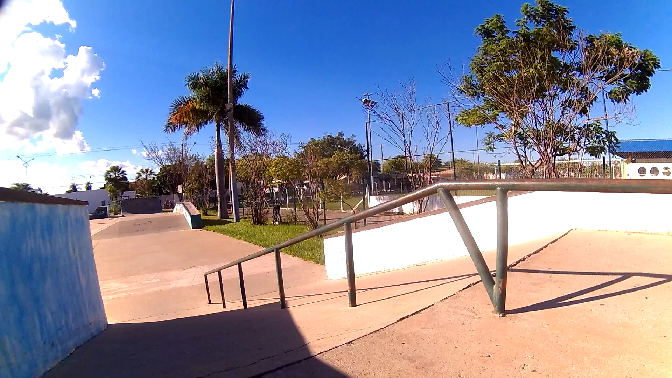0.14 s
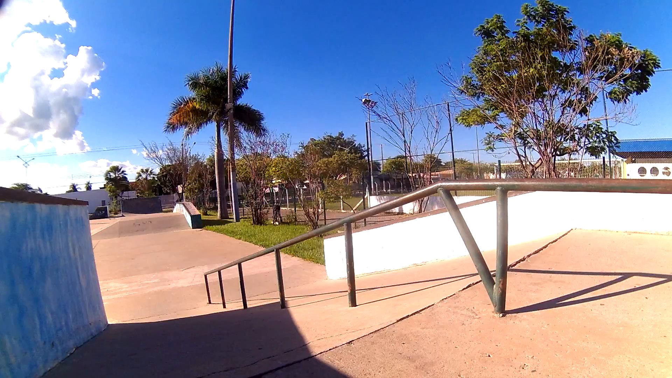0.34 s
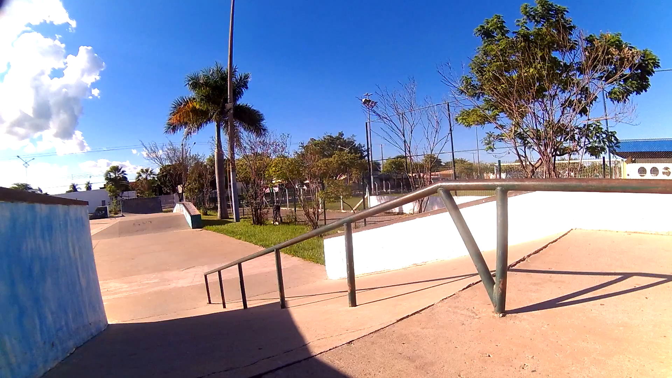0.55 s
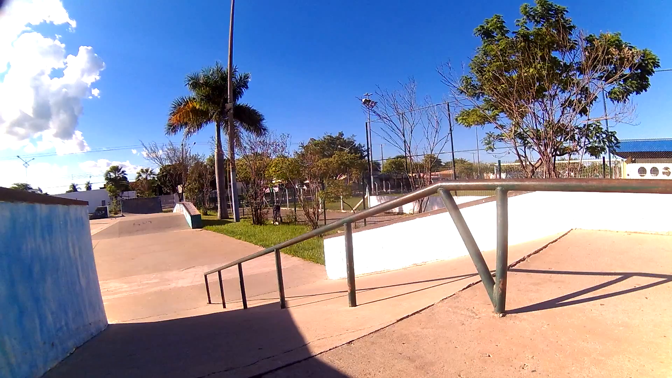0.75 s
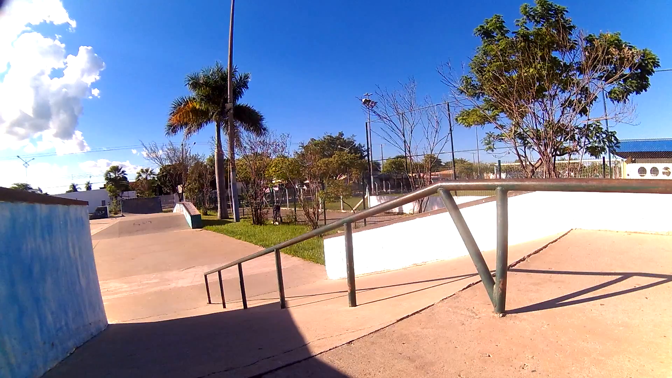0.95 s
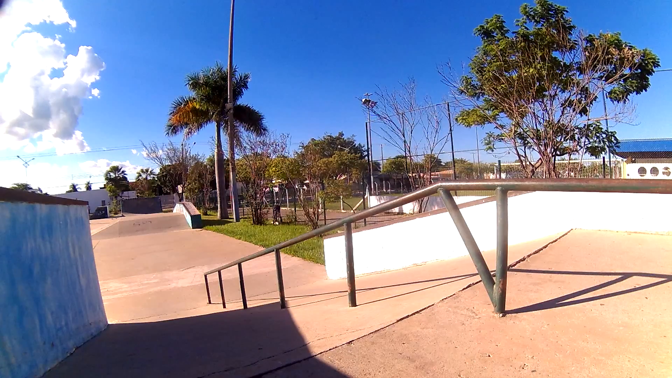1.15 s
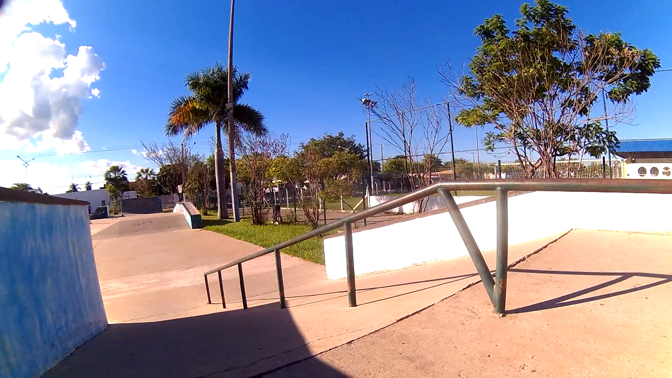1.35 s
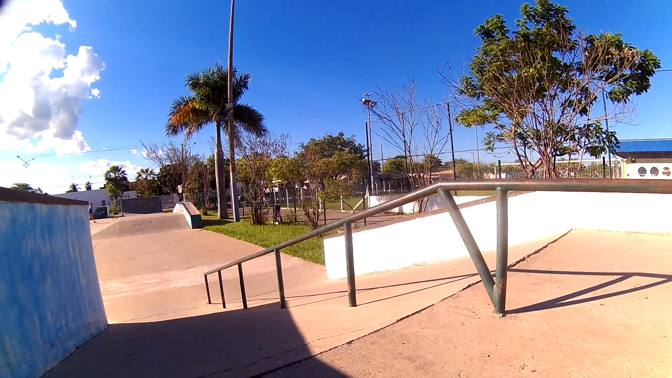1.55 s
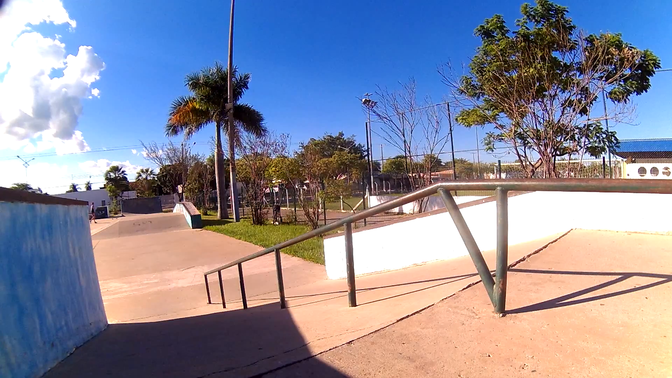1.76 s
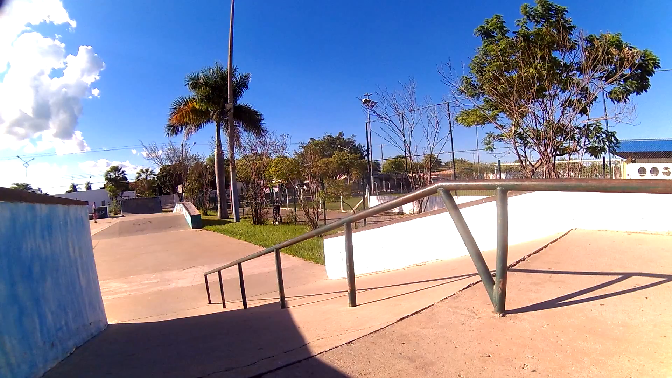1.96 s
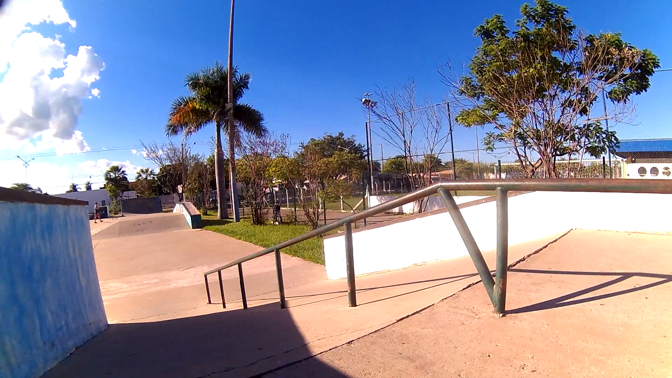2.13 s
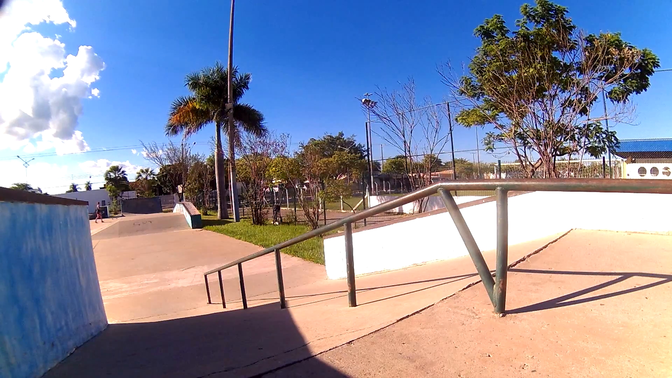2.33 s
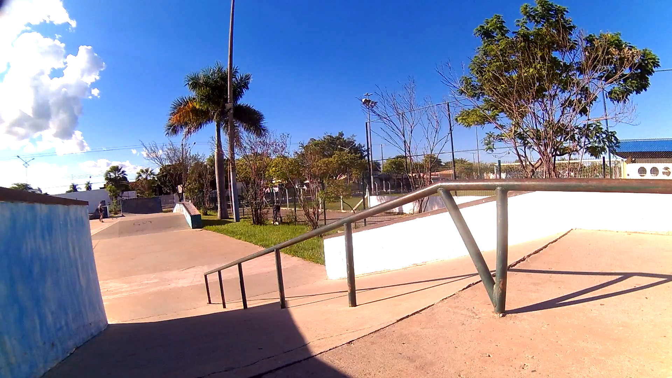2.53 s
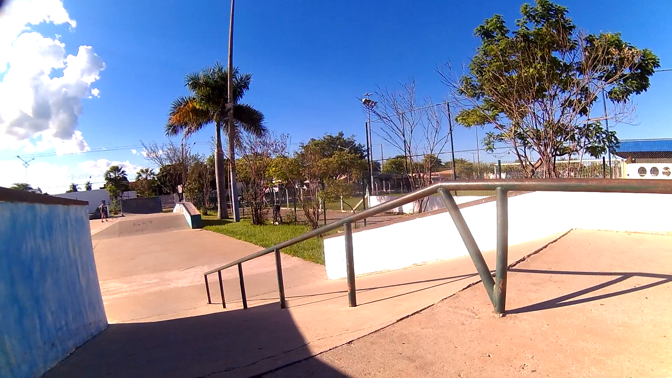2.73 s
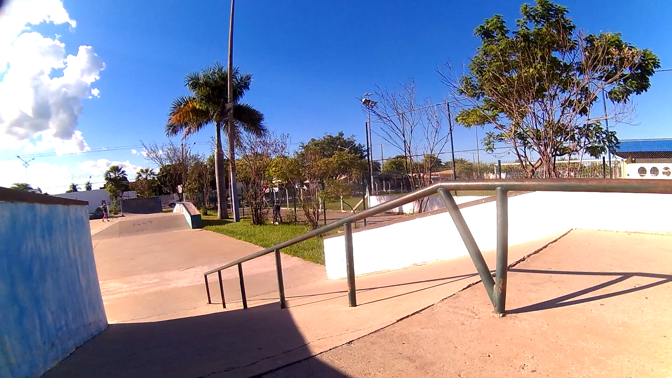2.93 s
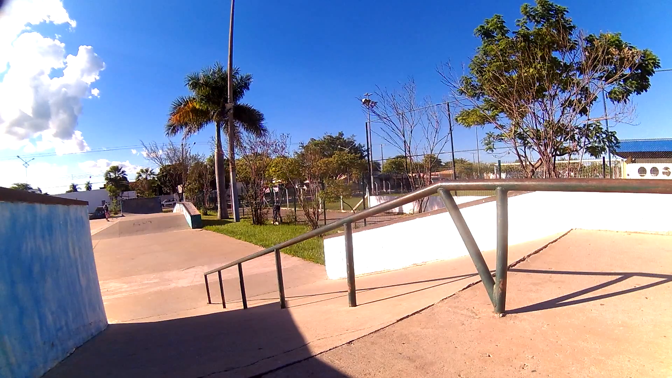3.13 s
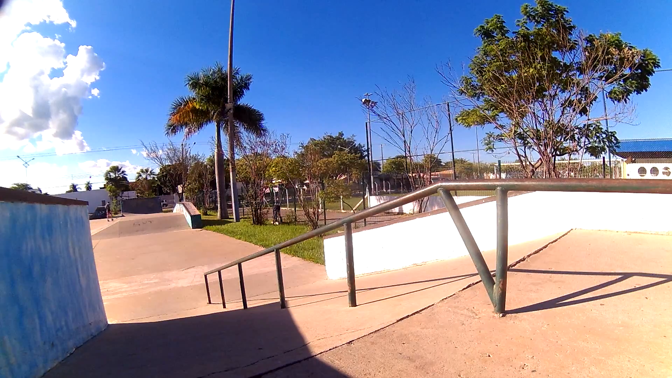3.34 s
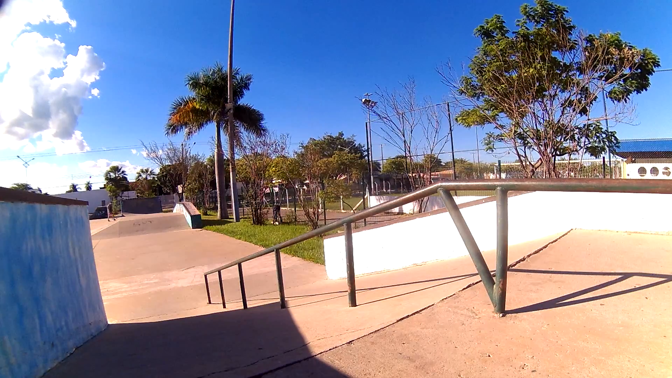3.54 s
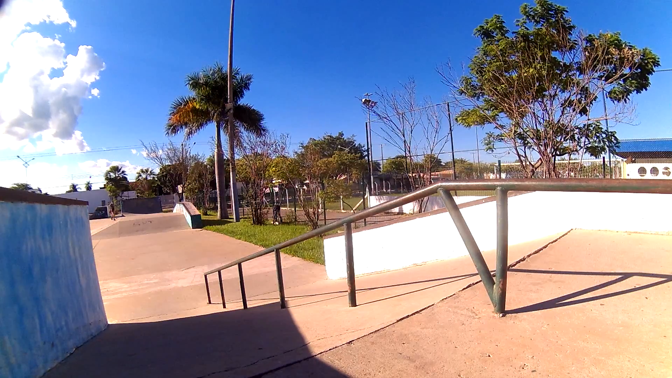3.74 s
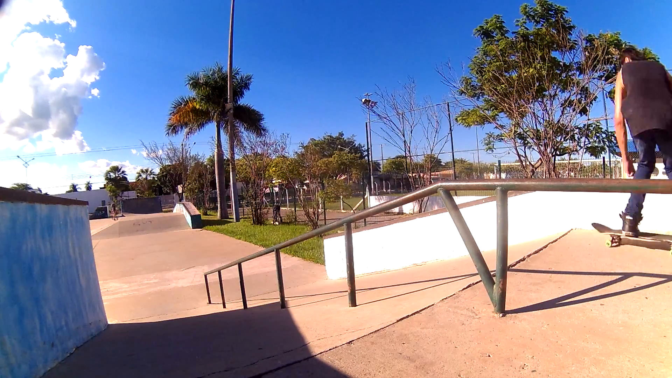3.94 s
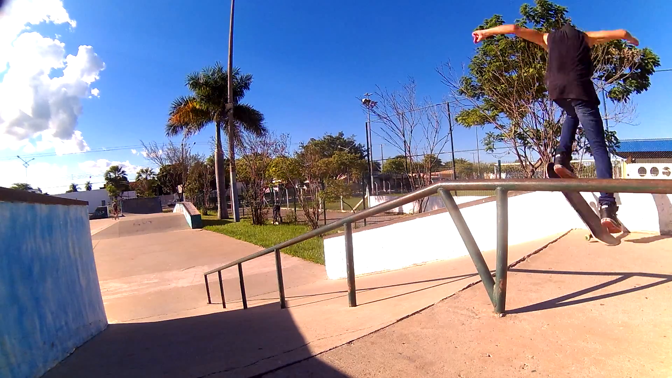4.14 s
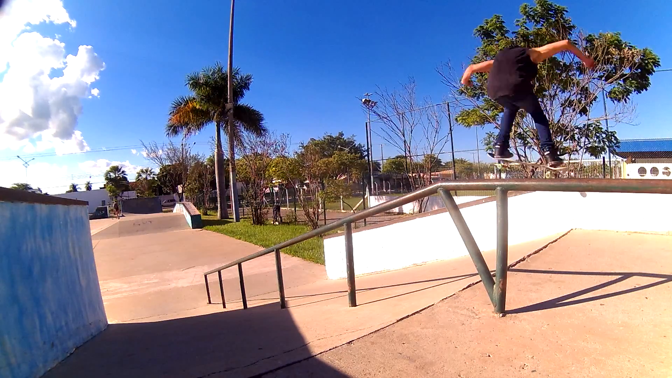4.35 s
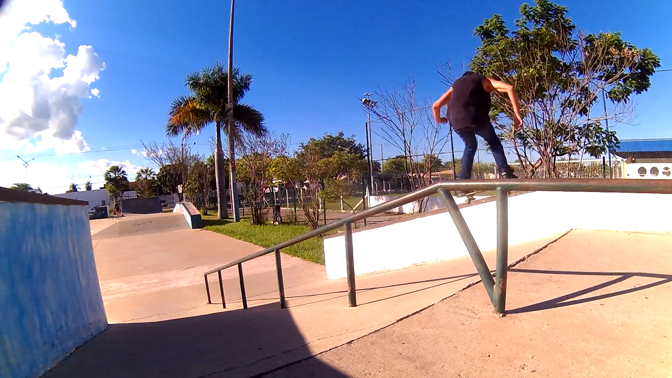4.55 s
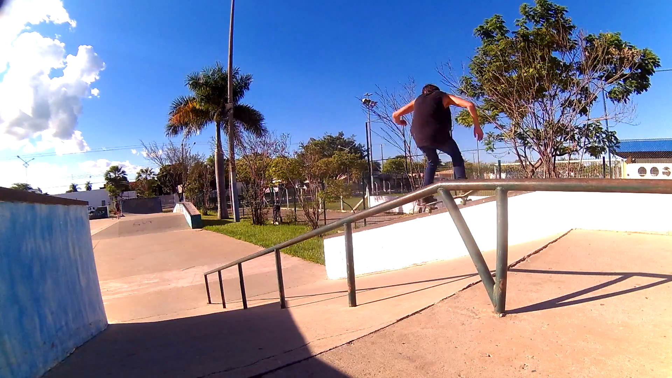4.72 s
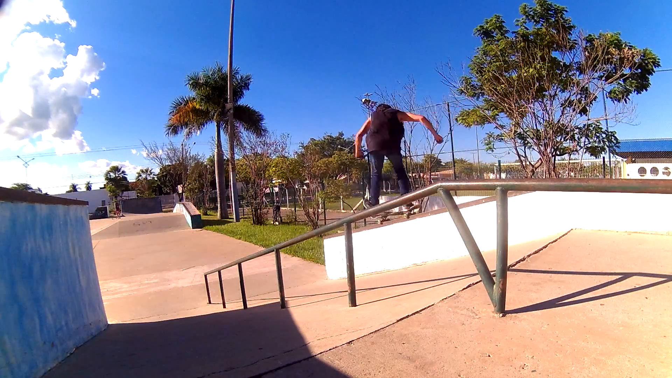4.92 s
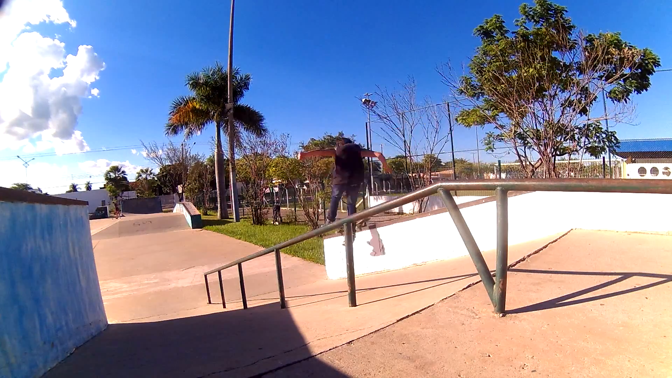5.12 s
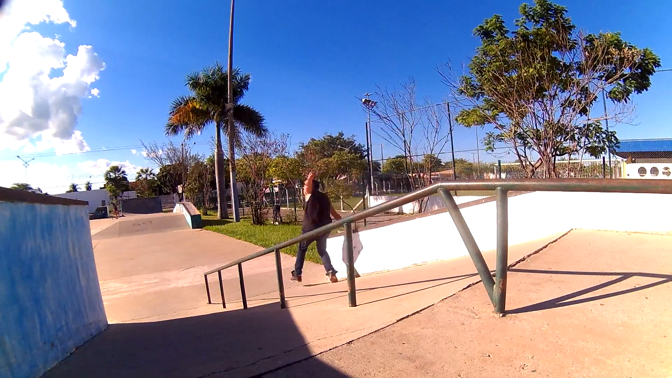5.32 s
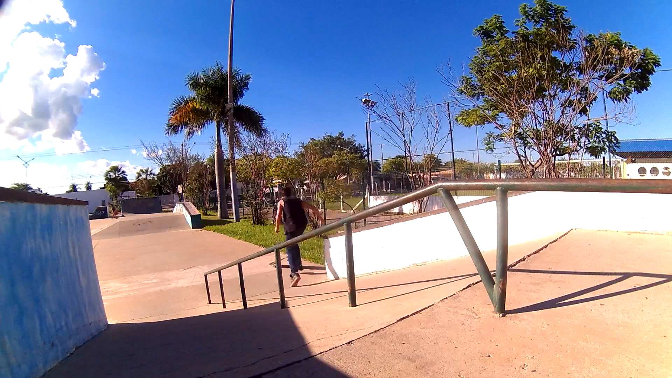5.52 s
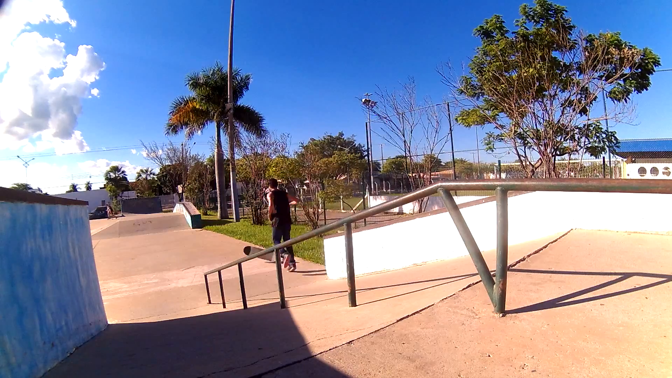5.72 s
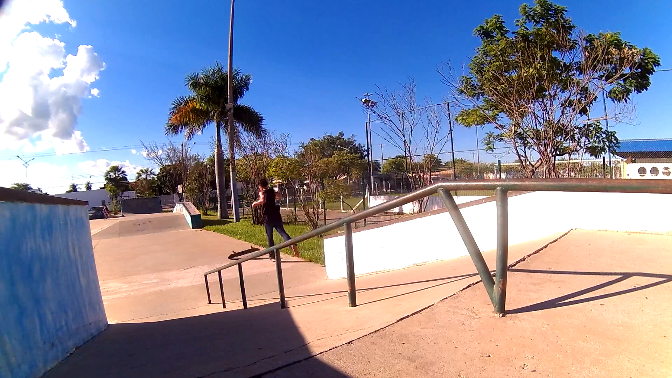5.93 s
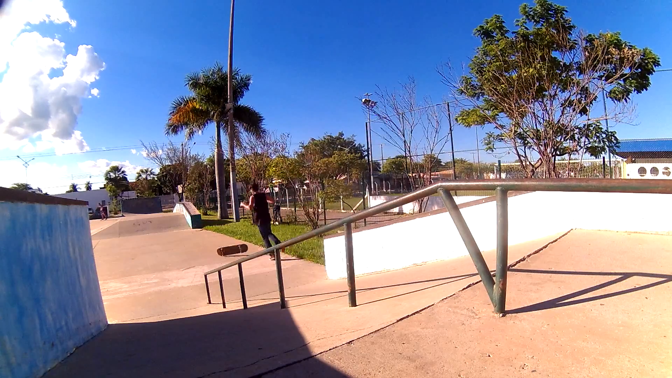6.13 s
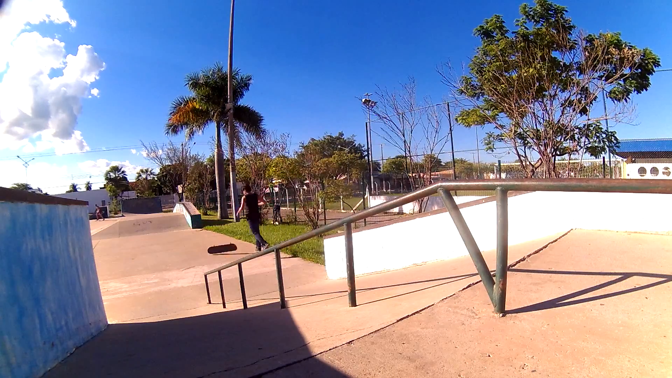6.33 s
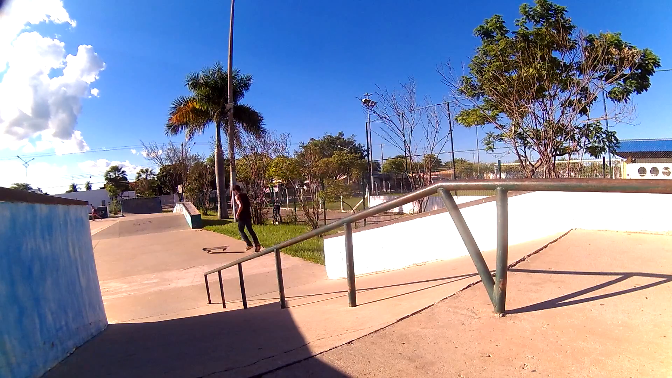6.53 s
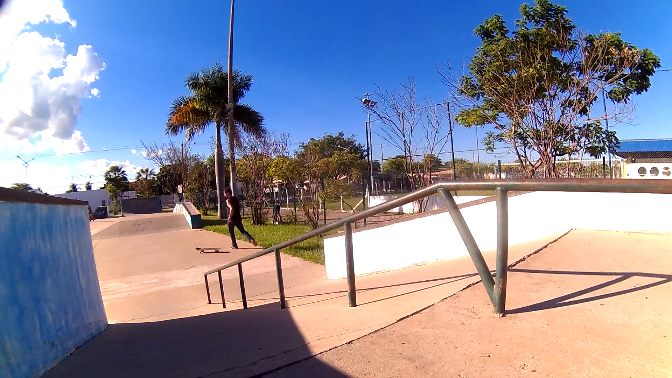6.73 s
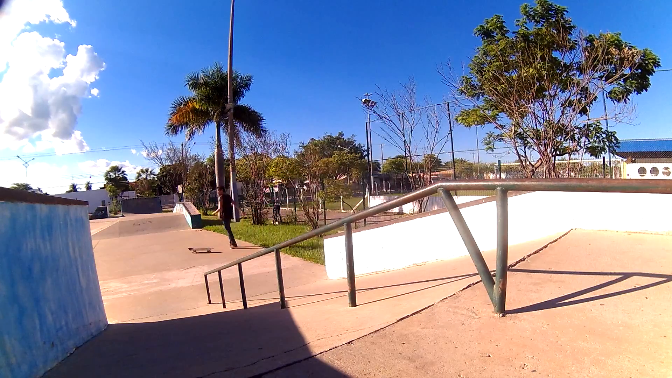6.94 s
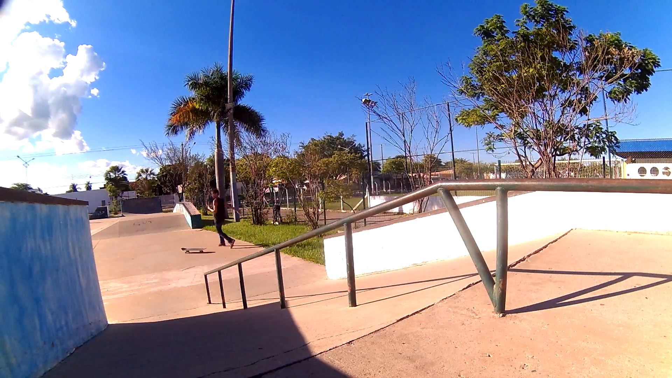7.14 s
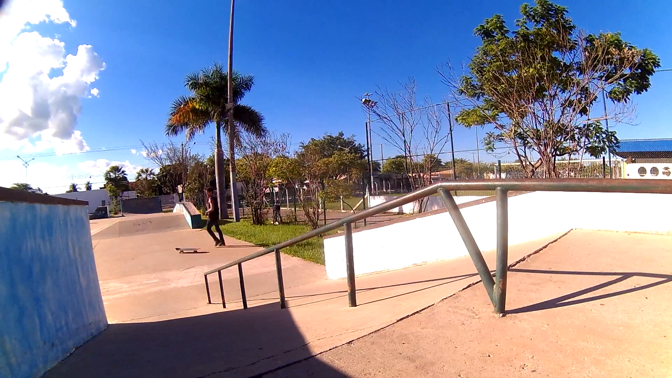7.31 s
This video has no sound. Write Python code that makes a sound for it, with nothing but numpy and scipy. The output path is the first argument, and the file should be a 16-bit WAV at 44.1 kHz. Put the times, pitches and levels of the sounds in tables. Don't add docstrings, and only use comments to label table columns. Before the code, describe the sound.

A wooden skateboard is heard close to a boxy little camera microphone. After one far pop and low breeze, soft knocks lead to a heavy drop and gritty rolling that swells. The board pops, cracks onto a ledge, slides and rattles, then smashes onto concrete and bounces away in hollow slaps, thinning to light ticks. Short dull echoes come from concrete walls; loud blows clip and briefly duck the background.

```python
import sys
import numpy as np
from scipy import signal
from scipy.fft import rfft, irfft
from scipy.io import wavfile
from scipy.ndimage import uniform_filter1d, minimum_filter1d

SR = 44100
rng = np.random.default_rng(int(sys.argv[2]) if len(sys.argv) > 2 else 0)


def amplitude_ratio(level_db):
    exponent = np.asarray(level_db, float) / 20
    return 10 ** exponent


def materialize(psi):
    bounded = np.clip(np.atleast_2d(psi).T, -1, 1)
    quanta = np.round(bounded * 32767).astype(np.int16)
    wavfile.write(sys.argv[1], SR, quanta)


N = 329427


def rms_one(x):
    return x / np.sqrt(np.mean(x ** 2) + 1e-20)


def band(x, low_hz, high_hz):
    return signal.sosfilt(signal.butter(2, [low_hz, high_hz], "band", fs=SR, output="sos"), x)


def resonate(x, hz, width_hz):
    r = np.exp(-np.pi * width_hz / SR)
    poles = [1, -2 * r * np.cos(2 * np.pi * hz / SR), r * r]
    return signal.lfilter([(1 - r * r) / 2, 0, (r * r - 1) / 2], poles, x)


def peak(x, hz, width_hz, db):
    w, a = 2 * np.pi * hz / SR, amplitude_ratio(db / 2)
    q = np.sin(w) * width_hz / hz / 2
    middle = -2 * np.cos(w)
    return signal.lfilter([1 + q * a, middle, 1 - q * a], [1 + q / a, middle, 1 - q / a], x)


def drift(rate_hz):
    r = np.exp(-80 * np.pi * rate_hz / SR)
    slow = signal.lfilter([1], [1, -2 * r, r * r], rng.standard_normal(N // 40 + 2002))[2000:]
    return np.interp(np.arange(N) / 40, np.arange(len(slow)), rms_one(slow))


def gate(start_s, length_s, edge_s):
    t = np.arange(N) / SR - start_s
    edges = np.minimum(t / edge_s, (length_s - t) / edge_s / 4.5 + 1)
    return np.clip(edges, 0, 1) * amplitude_ratio(-5 * np.clip(t / length_s, 0, 2))


def coloured_noise(spectrum, patchy_db):
    hz, db = np.transpose(spectrum)
    grid_hz = np.fft.rfftfreq(N, 1 / SR) + 1
    gain = amplitude_ratio(np.interp(np.log(grid_hz), np.log(hz), db, left=-60))
    shaped = irfft(rfft(rng.standard_normal(N)) * gain, N)
    return rms_one(shaped * amplitude_ratio(patchy_db * drift(13.5)))


# pitch_hz, density_db_per_hz
PARK = [(12, -40), (20, 3), (76, 2.5), (130, -5.5), (315, -7.5), (401, -15.5), (632, -13.5), (1410, -27),
        (2160, -25.5), (3230, -30), (4110, -42), (12000, -104), (15600, -80), (22000, -120)]


def park():
    return amplitude_ratio(-38) * coloured_noise(PARK, patchy_db=2.0)


# start_s, length_s, pitch_hz, level_db
CHIRPS = [(1.195, .02, 7950, -61)]


def bird():
    turn = 2 * np.pi * np.arange(N) / SR
    out = np.zeros(N)
    for start_s, length_s, hz, db in CHIRPS:
        note = np.sin(hz * turn) + 2.5 * np.sin(2 * hz * turn)
        out += amplitude_ratio(db) * gate(start_s, length_s, edge_s=0.008) * note
    return out


# time_s, wheel_load_db, slip_and_nearness_db
ROLL = [(0, -42.5, -55), (1.93, -43.5, -60), (2.3, -42, -55), (2.52, -33.5, -62), (2.96, -30.5, -52),
        (3.64, -28, -48.5), (3.96, -24.5, -41.5), (4.09, -32.5, -49), (4.12, -53, -67), (4.58, -34, -43.5),
        (4.7, -30, -40.5), (5.12, -37, -41), (5.36, -51, -53), (5.64, -24, -38), (5.76, -35.5, -49.5),
        (6.19, -44.5, -53.5), (6.69, -49.5, -49), (7.2, -56, -54.5)]


def ride():
    time_s, *controls = np.transpose(ROLL)
    return [np.interp(np.arange(N) / SR, time_s, control) for control in controls]


def follow(load_db, slip_db, middle_db, load_share, slip_share):
    return middle_db + load_share * (load_db + 35) + slip_share * (slip_db + 52)


# pitch_hz, density_db_per_hz
GUST_SPECTRUM = [(30, 1.5), (55, -0.5), (80, 9.5), (130, 4), (220, -3.5), (400, -52.5)]
# peak_s, half_length_s, level_db
GUSTS = [(0.638, 0.041, -30.5), (0.992, 0.059, -45), (1.23, 0.082, -37), (2.484, .02, -18.5),
         (2.597, 0.091, -24), (5.29, 0.091, -28), (5.558, 0.037, -27.5), (2.826, 0.15, -34),
         (3.276, 0.15, -28), (4.288, .02, -24), (4.61, 0.02, -34), (4.91, 0.12, -30), (5.705, 0.05, -20.5),
         (6.69, 0.01, -24)]


def wind():
    buffet = coloured_noise(GUST_SPECTRUM, patchy_db=-1.3)
    strength = np.sqrt(uniform_filter1d(buffet ** 2, size=2000) + 0.033)
    t = np.arange(N) / SR
    breeze = amplitude_ratio(-46)
    gusts = sum(amplitude_ratio(db) * np.exp(-((t - peak_s) / half_s) ** 2) for peak_s, half_s, db in GUSTS)
    rumble = amplitude_ratio(follow(*ride(), middle_db=-36, load_share=0.6, slip_share=0.036))
    return (breeze + gusts + rumble) * buffet / strength ** 0.84


def grit(per_s, spread_db):
    sizes = amplitude_ratio(spread_db * np.minimum(rng.exponential(1, N), 4)) * rng.choice([-1, 1], N)
    return sizes * (rng.random(N) < per_s / SR) + 1e-9


# pitch_hz, width_hz, level_db
HUM = [(478.3, 14, -4), (663, 13.6, -2.5), (1076, 12, -18.5)]


def hum():
    force = grit(1200, spread_db=2.5)
    modes = np.zeros(N)
    for hz, width_hz, db in HUM:
        modes += amplitude_ratio(db + 2.5 * drift(9)) * rms_one(resonate(force, hz, width_hz))
    riding = amplitude_ratio(follow(*ride(), middle_db=-42.5, load_share=0.51, slip_share=0.077))
    riding = riding * gate(2.3, length_s=1.5, edge_s=0.02)
    crouch = amplitude_ratio(-24.5) * gate(3.835, length_s=0.13, edge_s=0.0093)
    return modes * (riding + crouch)


# pitch_hz, width_hz, level_db
DECK = [(275, 51, 0.5), (401, 68, -3), (456, 52.5, -1), (670, 95, -1), (834, 165, -8.5), (1050, 140, -14.5),
        (1370, 160, -21)]


def deck(force):
    out = 0
    for k, (hz, width_hz, db) in enumerate(DECK):
        out = out + (-1) ** k * amplitude_ratio(db) * resonate(force, hz, width_hz)
    return out


def wheel_levels(load_db, slip_db):
    rasp_db = follow(load_db, slip_db, middle_db=-47, load_share=0.41, slip_share=0.1)
    whirr_db = follow(load_db, slip_db, middle_db=-64, load_share=0.12, slip_share=0.67)
    return np.array([load_db, rasp_db, slip_db, whirr_db])


# start_s, length_s, level_db
RASPS = [(2.154, 0.27, -39), (2.65, 0.63, -46.5), (4.594, 0.14, -37.5), (5.244, 0.26, -48)]
# start_s, length_s, level_db
SPINS = [(2.2, .25, -60), (4.803, 0.28, -50), (6.515, .3, -53.5)]
# start_s, length_s, load_db, slip_db, rasp_over_rolling_db
SCUFFS = [(2.46, 0.035, -22.5, -39, 15.5), (4.409, 0.034, -7.5, -30, -4), (4.489, .03, -23, -39, 7),
          (5.149, 0.045, -28, -37, 11), (5.234, 0.023, -39, -31, 17), (5.485, 0.059, -18, -28.5, 17),
          (5.759, 0.079, -30.5, -43, 4), (5.865, 0.084, -33, -58, -6), (5.948, 0.015, -49, -33, 22),
          (6.053, 0.024, -18, -36, 15), (6.297, 0.023, -26, -28, 10), (4.274, 0.023, -38, -45, -9),
          (2.627, 0.14, -29.5, -60, 4), (6.519, 0.065, -34, -46, -13)]


def rolling():
    bumps_db = 1.32 * drift(25)
    shake = rms_one(deck(grit(1500, spread_db=2.0))) * amplitude_ratio(-3.5 + bumps_db)
    rasp = rms_one(band(grit(5000, spread_db=2.0), 1190, 2010)) * amplitude_ratio(-7 + 0.86 * bumps_db)
    hiss = rms_one(band(grit(12000, spread_db=4.0), 1700, 9800)) * amplitude_ratio(-8.5 + 0.92 * bumps_db)
    whirr = rms_one(band(grit(15000, spread_db=3), 10500, 13000)) * amplitude_ratio(-8 + 0.3 * bumps_db)
    gains = amplitude_ratio(wheel_levels(*ride()))
    for start_s, length_s, db in RASPS:
        gains[1] += amplitude_ratio(db) * gate(start_s, length_s, edge_s=0.032)
    for start_s, length_s, db in SPINS:
        gains[3] += amplitude_ratio(db) * gate(start_s, length_s, edge_s=0.08)
    for start_s, length_s, load_db, slip_db, rasp_db in SCUFFS:
        levels_db = wheel_levels(load_db, slip_db) + [0, rasp_db, 0, 9]
        gains += amplitude_ratio(levels_db)[:, None] * gate(start_s, length_s, edge_s=0.0041)
    return np.sum(gains * np.array([shake, rasp, hiss, whirr]), axis=0)


def contact(t, rise_s, length_s, ring_db, t60_s):
    touch = np.exp(-(t / length_s) ** 3)
    return (1 - np.exp(-t / rise_s)) ** 1.58 * (touch + amplitude_ratio(ring_db - 60 * t / t60_s))


# start_s, knock_db, deck_hz, clack_db, crack_db
RUN_UP = [(1.975, -14, 730, -22.5, -45), (2.06, -11, 472, -21, -43), (2.103, -11, 620, -30, -53),
          (2.163, -41, 254, -34, -62), (2.19, -18, 333, -37, -61), (2.251, -16.5, 617, -28, -61),
          (2.325, -24, 680, -34, -51), (2.355, -25, 660, -33, -62), (2.388, -19, 670, -36, -53),
          (2.672, -13, 560, -34, -63)]
FAR_POP = [(.0515, 8.3, 583, -17, -60)]
SLAMS = [
    (2.5, 6, 670, -7.5, -31),
    (4.393, 3.6, 234, -5.5, -16),
    (6.107, 0.79, 776, -8.5, -27),
]
TRICK = [(4.42, -7, 615, -7.5, -11.5), (4.434, -5.5, 762, -7.5, -24), (4.499, -7, 728, -15.5, -25),
         (4.883, -17.5, 530, -21.5, -29.5), (5.156, -9.5, 643, -34, -31), (5.193, -10.5, 422, -14.5, -30),
         (5.212, -6.5, 654, -14, -26), (5.227, -10, 691, -23, -37), (5.304, -10, 363, -34, -51),
         (5.321, -30, 376, -16.5, -48), (5.485, -12.5, 207, -16, -29), (5.496, -13, 550, -22, -50)]
SMASHES = [(4.086, -1, 735, -1.5, -26), (4.3955, 5.5, 660, 6.5, -4.5), (5.286, 1.5, 500, 0.5, -15.5),
           (5.557, 7.5, 730, -3, -13), (5.571, 0.5, 640, 0.5, -20)]
DROPS = [(2.461, -10, 275, -18, -32.5), (2.474, -13.5, 410, -40, -60)]
WHEEL_BOUNCES = [(5.865, -7.5, 677, -16.5, -33), (6.527, -14.5, 534, -19, -25.5),
                 (6.56, -15, 257, -20.5, -29), (7.041, -22, 275, -29.5, -44.5)]
EDGE_BOUNCES = [(5.904, -16.5, 668, -15.5, -30.5), (6.271, -8.5, 396, -11, -29.5),
                (6.681, -21.5, 202, -38, -52), (6.706, -22, 707, -27, -30.5)]
FLAT_SLAPS = [(6.051, -7, 261, -10, -30), (6.091, -8.5, 293, -19.5, -35), (6.361, -1, 276, -10.5, -29.5),
              (6.383, -8.5, 304, -20, -37)]
FREE_RINGS = [(2.282, -19, 653, -35, -46), (3.597, -18, 687, -39, -47), (4.109, -18, 727, -30, -32),
              (5.767, -10, 669, -13.5, -28.5), (5.785, -13.5, 746, -23, -45)]
# table, rise_s, contact_s, ring_db, ring_t60_s, clack_hz
KINDS = [
    (RUN_UP, 0.004, 0.0055, -14.5, 0.083, 1870),
    (FAR_POP, 0.0022, 0.0036, -26, 0.074, 1350),
    (SLAMS, 0.0013, 0.0047, -14, 0.062, 1000),
    (TRICK, 0.0024, 0.0066, -14, 0.13, 2400),
    (SMASHES, 0.0024, 0.0053, -5.5, 0.073, 2670),
    (DROPS, 0.002, 0.0075, -2, 0.051, 1300),
    (WHEEL_BOUNCES, 0.0022, 0.0055, -10.5, 0.078, 2070),
    (EDGE_BOUNCES, .001, 0.0064, -7.5, 0.064, 1080),
    (FLAT_SLAPS, 0.0027, 0.0068, -5.5, 0.11, 1100),
    (FREE_RINGS, 0.0014, 0.0065, -9, 0.2, 1460),
]


def knocks():
    size = SR // 4
    t, out = np.arange(size) / SR, np.zeros(N + size)
    air = 0.41 * np.sin(2 * np.pi * 138.5 * t) * amplitude_ratio(-60 * t / 0.1)
    for table, rise_s, contact_s, ring_db, t60_s, _ in KINDS:
        force = contact(t, rise_s, contact_s, ring_db, t60_s)
        wood_share = min(amplitude_ratio(3 + 0.8 * ring_db), 0.5)
        for start_s, knock_db, hz, _, _ in table:
            wood = deck(rng.standard_normal(size) * force)
            wood = wood_share * wood / np.abs(wood).max()
            mode = np.sin(2 * np.pi * hz * t) * force
            push = air * 100 / hz
            at = round(start_s * SR)
            out[at:at + size] += amplitude_ratio(knock_db - 1.5) * (mode + push + wood)
    return out[:N]


# start_s, clack_db, crack_db
TICKS = [(4.0625, -30, -41), (4.9257, -29, -34.5), (4.959, -34, -38), (5.0344, -29.5, -38),
         (6.589, -37, -37), (6.6522, -41, -42), (7.157, -48, -49), (6.7745, -44, -46), (6.8237, -36, -37),
         (6.914, -35.5, -38), (7.057, -37, -39), (7.3974, -55, -43.5)]
# pitch_hz, width_hz
TRUCKS = [(4150, 37), (5930, 64), (6400, 290), (7900, 76), (11500, 950)]
TRUCK_DB = [4, -2.5, -2.5, -2.5, 0]


def clacks():
    size = SR // 4
    t, out = np.arange(size) / SR, np.zeros(N + size)
    rows = [(start_s, clack_db, 1880, crack_db, 0.0094) for start_s, clack_db, crack_db in TICKS]
    for table, _, contact_s, _, _, clack_hz in KINDS:
        rattle_s = 1.42 * contact_s
        rows += [(start_s, clack_db, clack_hz, crack_db, rattle_s) for start_s, _, _, clack_db, crack_db in table]
    snap = amplitude_ratio(-1) * band(np.exp(-t / 0.00016), 530, 3640)
    for start_s, clack_db, hz, crack_db, rattle_s in rows:
        force = contact(t, 0.0002, rattle_s, ring_db=-22.0, t60_s=0.35)
        force = force * (1 + 0.68 * np.exp(-t / 0.00051))
        clack = band(rng.standard_normal(size) * force, 574, 2260)
        clack = 0.5 * clack + 1.2 * resonate(clack, hz, 440) + snap
        rattle = rng.standard_normal(size) * force
        crack = band(rattle, 4200, 10530) + 0.21 * band(rattle, 10300, 15200)
        mode_db = np.array(TRUCK_DB) + 3 * rng.standard_normal(len(TRUCKS))
        crack = crack + sum(amplitude_ratio(db) * resonate(crack, *mode) for db, mode in zip(mode_db, TRUCKS))
        at = round(start_s * SR)
        out[at:at + size] += amplitude_ratio(clack_db + 3) * clack + amplitude_ratio(crack_db - 3.0) * crack
    return out[:N]


# delay_s, level_db
WALLS = [(0.009, -8), (0.023, -22.5), (0.035, -19.5), (0.059, -25), (0.081, -30.5)]


def echoes(hits):
    t = np.arange(SR // 4) / SR
    smear = np.zeros(len(t))
    for delay_s, db in WALLS:
        smear += amplitude_ratio(db) * (t > delay_s) * np.exp(-np.maximum(t - delay_s, 0) / 0.0071)
    tail = band(rng.standard_normal(len(t)), 114, 10600) * smear * amplitude_ratio(-26.5)
    return signal.fftconvolve(hits, tail)[:N]


def scene():
    hits = knocks() + clacks()
    return (park() + bird() + wind() + hum() + rolling() + hits + echoes(hits))[None]


# pitch_hz, width_hz, level_db
CASE = [(670, 730, 5), (1330, 860, -5.5), (2115, 440, 6), (2890, 400, 4), (3230, 645, -11),
        (4150, 700, 8), (4850, 600, -6), (5950, 700, 5), (7000, 400, -3), (7800, 700, 4), (9300, 2000, -9),
        (11000, 1000, 5), (12400, 900, 5), (13600, 1500, -5)]


def duck(x):
    from_db, slope, hold_s, lag_s = -11.5, 0.46, 0.166, 0.014
    level_db = 10 * np.log10(uniform_filter1d(x * x, size=441) + 1e-9)
    hold = int(hold_s * SR) // 2 * 2 + 1
    gain_db = -slope * np.maximum(level_db - from_db, 0)
    gain_db = minimum_filter1d(gain_db, size=hold, origin=hold // 2)
    lag = np.exp(-1 / (lag_s * SR))
    return x * amplitude_ratio(signal.lfilter([1 - lag], [1, -lag], gain_db))


def roll_off(x):
    return signal.sosfilt(signal.butter(12, 17730, fs=SR, output="sos"), x)


def record(dry):
    x = dry[0]
    for hz, width_hz, db in CASE:
        x = peak(x, hz, width_hz, db)
    x = signal.sosfilt(signal.butter(4, 16700, fs=SR, output="sos"), x)
    x = x + amplitude_ratio(-59) * band(rng.standard_normal(N), 2100, 16400)
    return roll_off(np.clip(duck(x), -1, 1)[None])


dry = scene()
out = record(dry)
materialize(out)
```